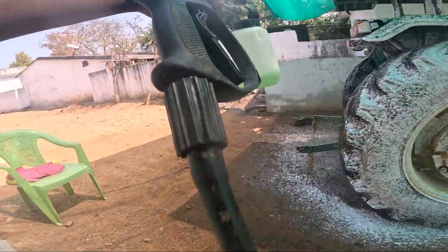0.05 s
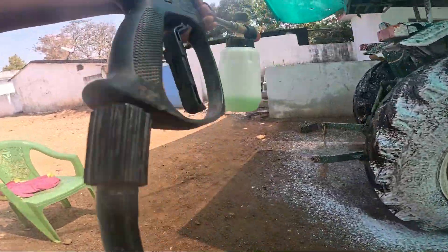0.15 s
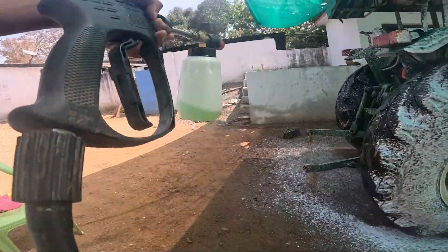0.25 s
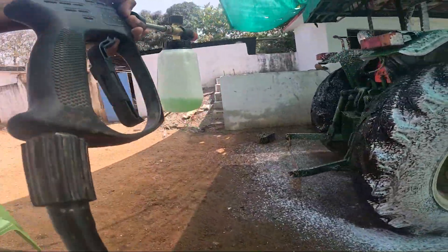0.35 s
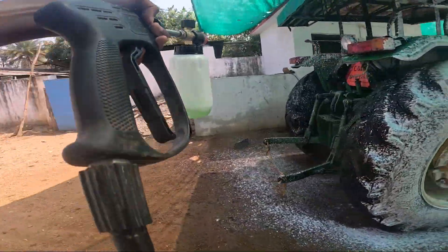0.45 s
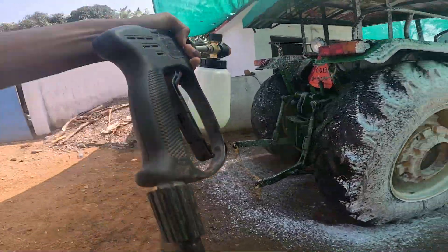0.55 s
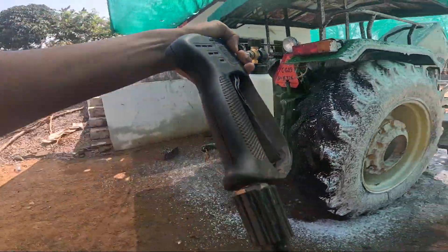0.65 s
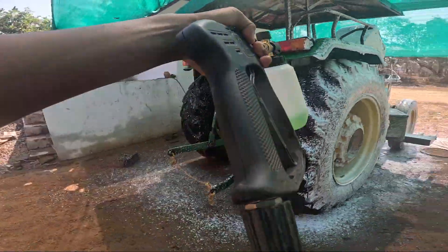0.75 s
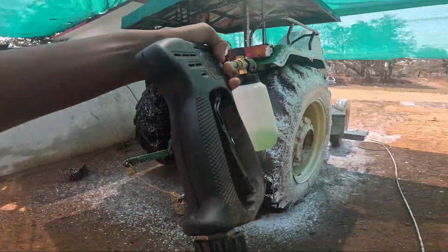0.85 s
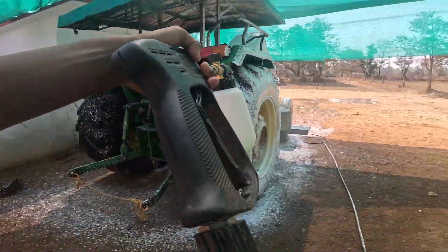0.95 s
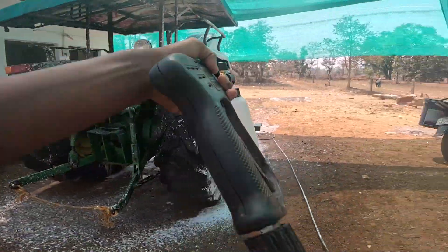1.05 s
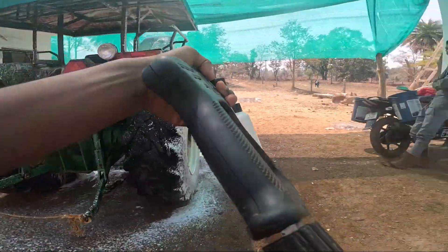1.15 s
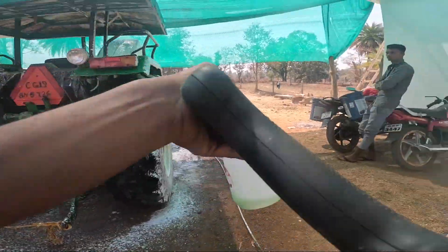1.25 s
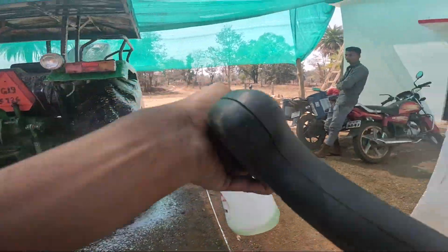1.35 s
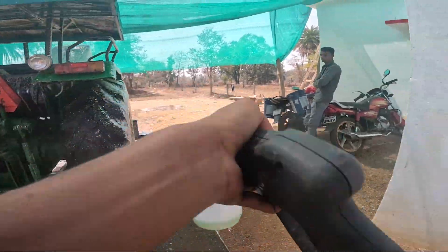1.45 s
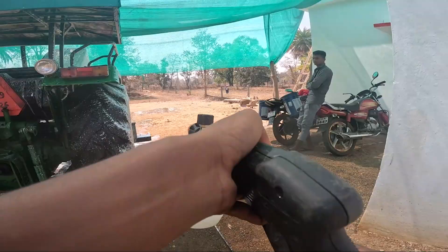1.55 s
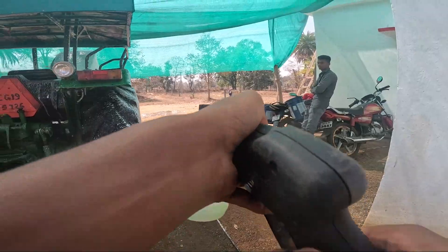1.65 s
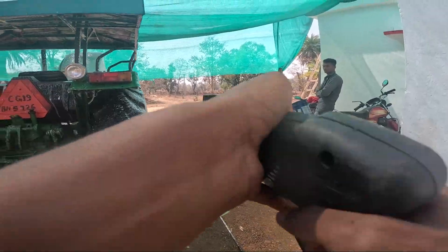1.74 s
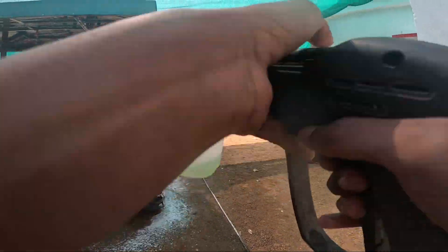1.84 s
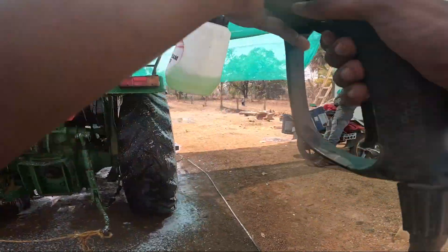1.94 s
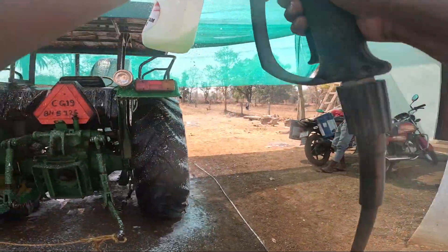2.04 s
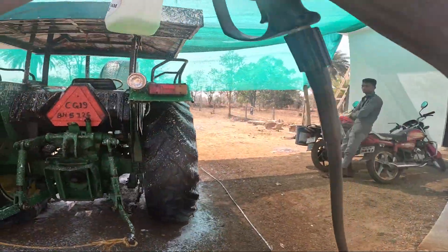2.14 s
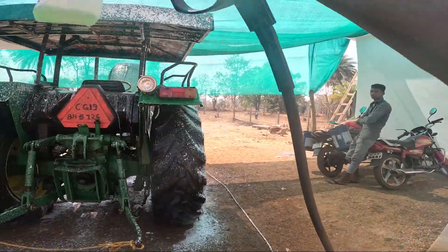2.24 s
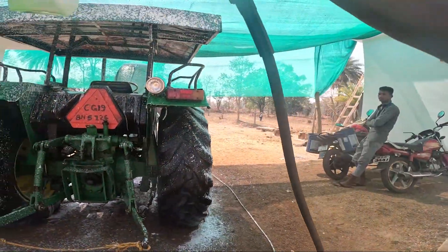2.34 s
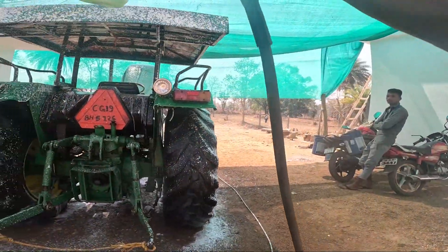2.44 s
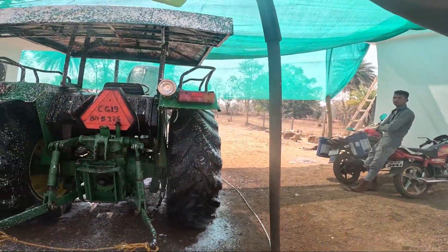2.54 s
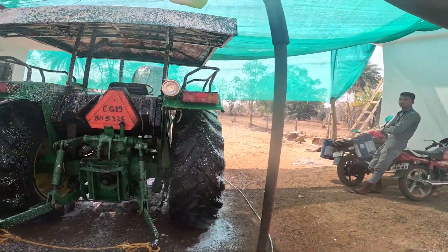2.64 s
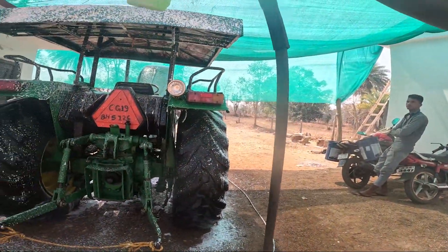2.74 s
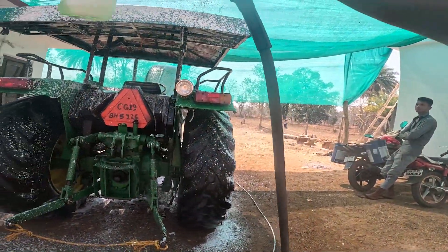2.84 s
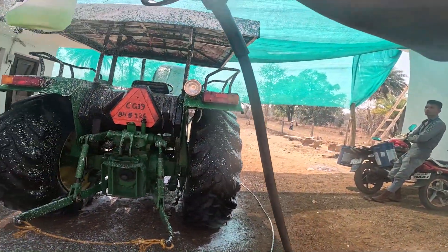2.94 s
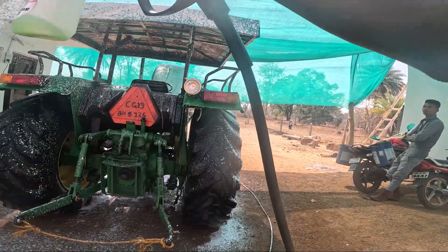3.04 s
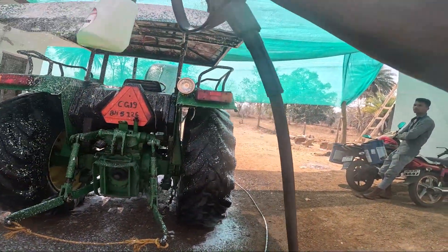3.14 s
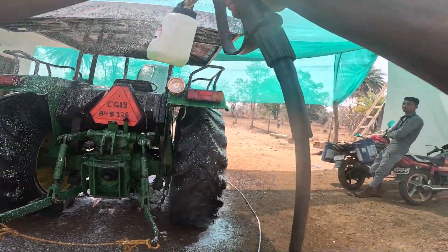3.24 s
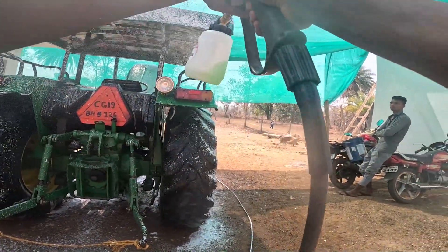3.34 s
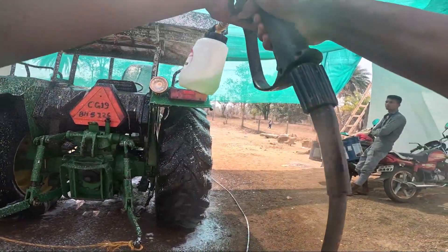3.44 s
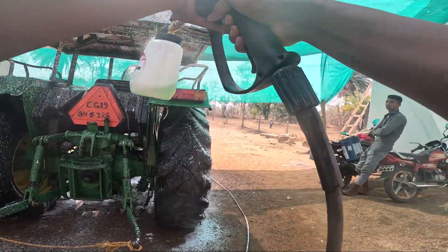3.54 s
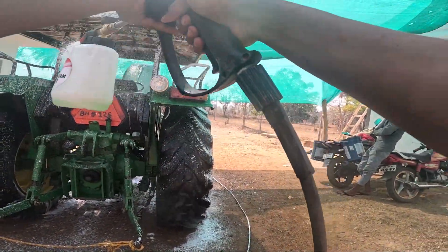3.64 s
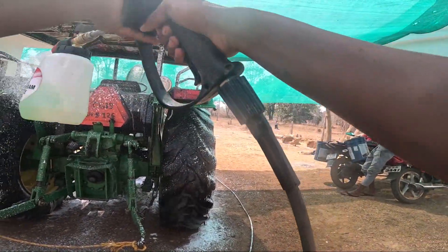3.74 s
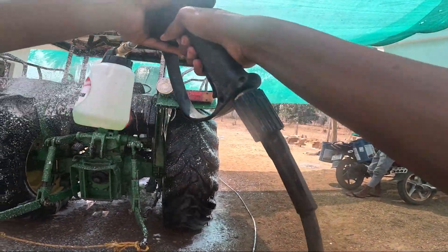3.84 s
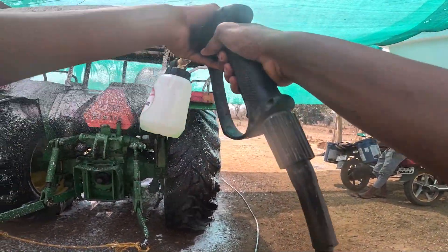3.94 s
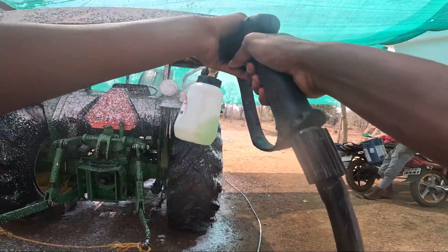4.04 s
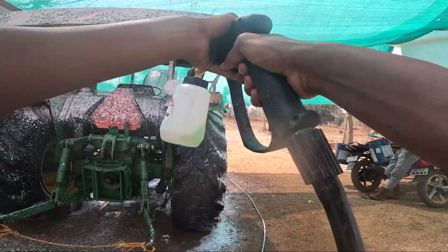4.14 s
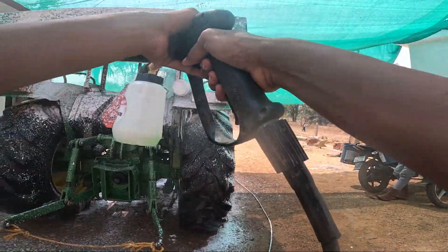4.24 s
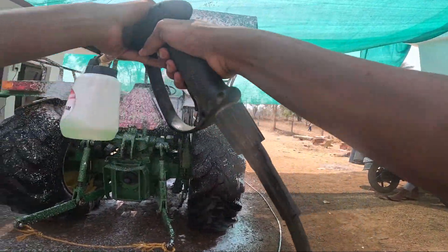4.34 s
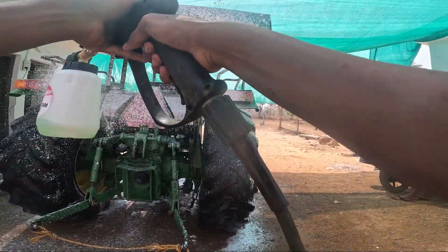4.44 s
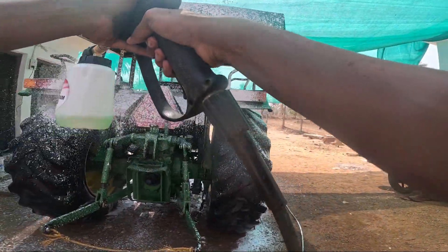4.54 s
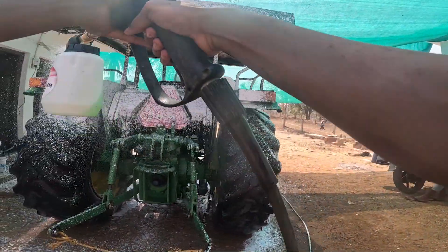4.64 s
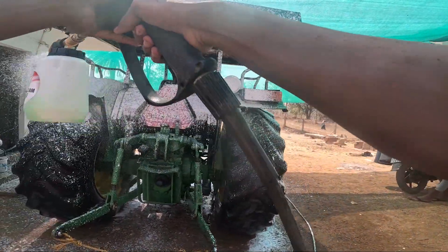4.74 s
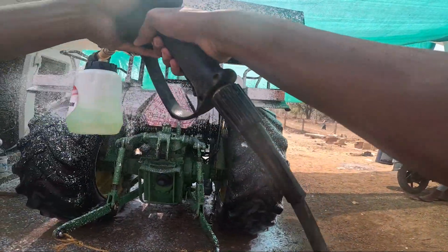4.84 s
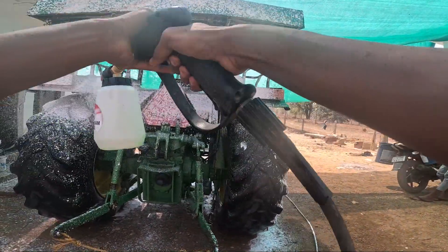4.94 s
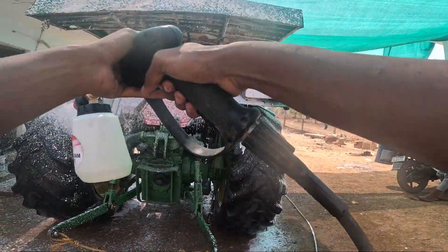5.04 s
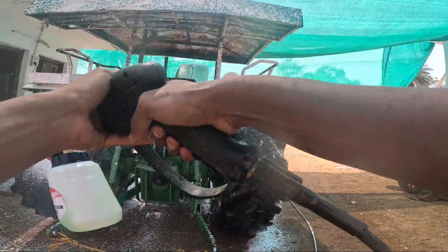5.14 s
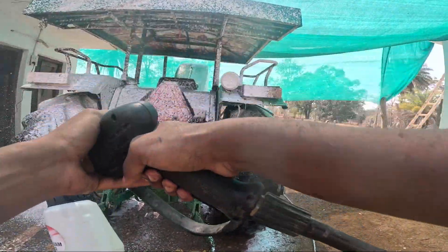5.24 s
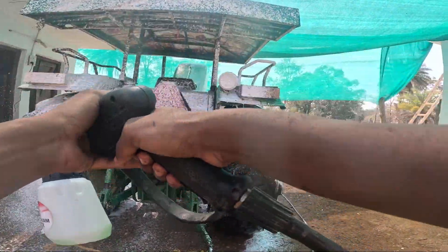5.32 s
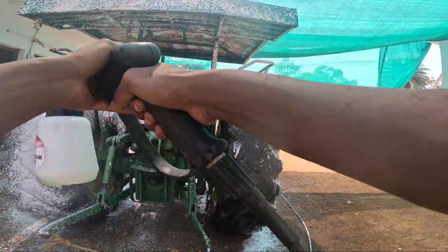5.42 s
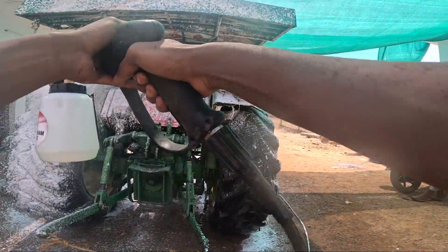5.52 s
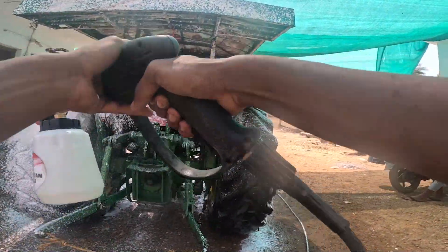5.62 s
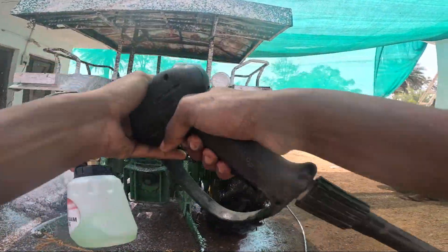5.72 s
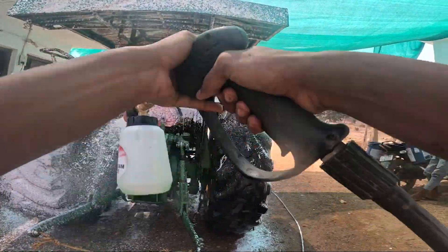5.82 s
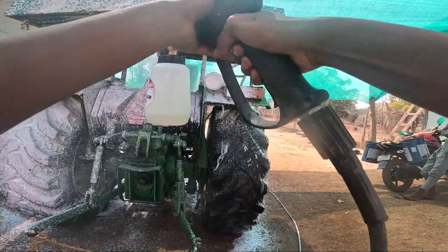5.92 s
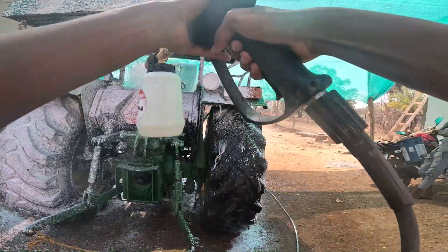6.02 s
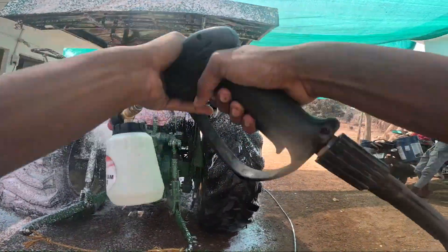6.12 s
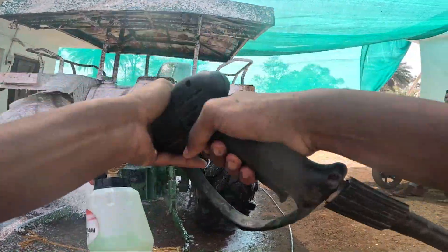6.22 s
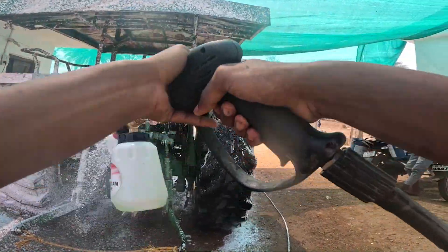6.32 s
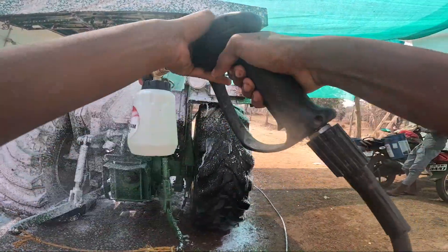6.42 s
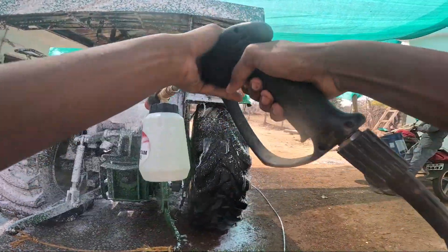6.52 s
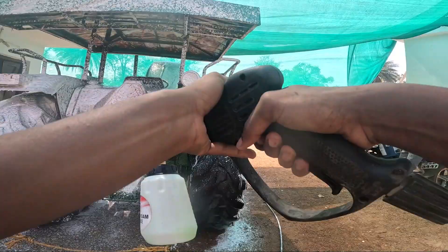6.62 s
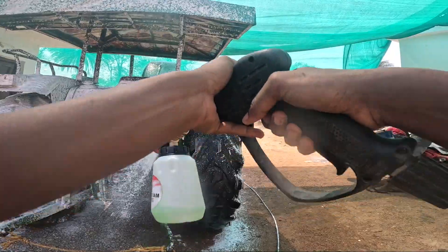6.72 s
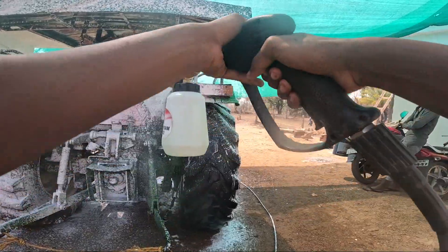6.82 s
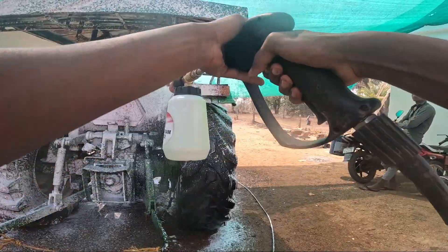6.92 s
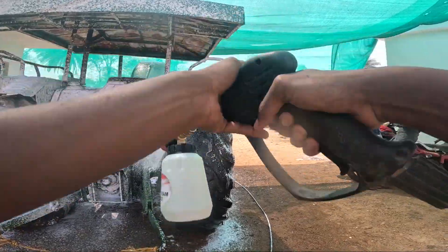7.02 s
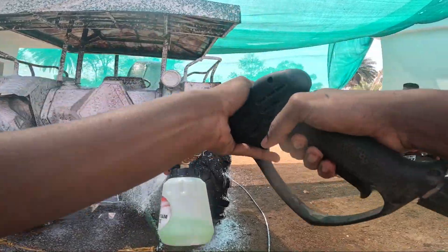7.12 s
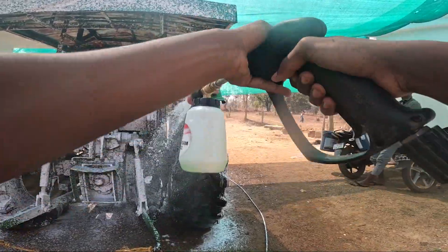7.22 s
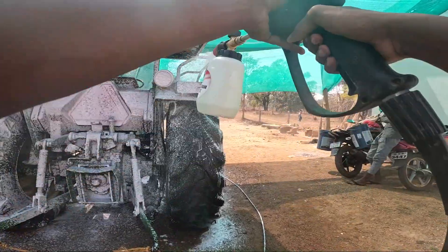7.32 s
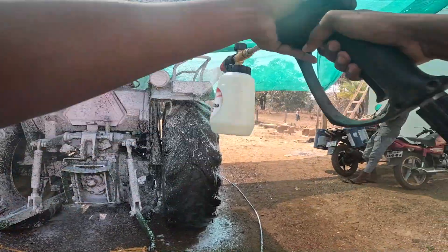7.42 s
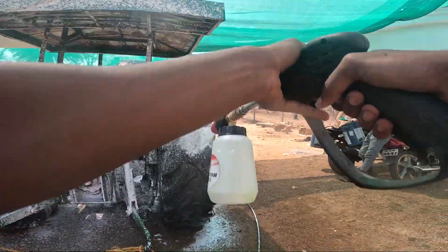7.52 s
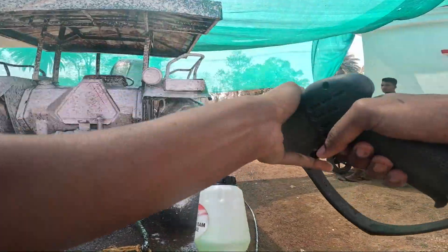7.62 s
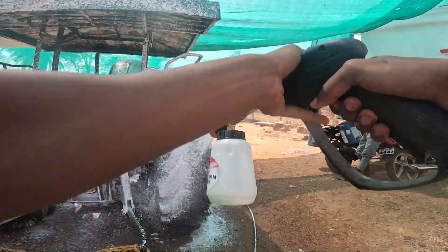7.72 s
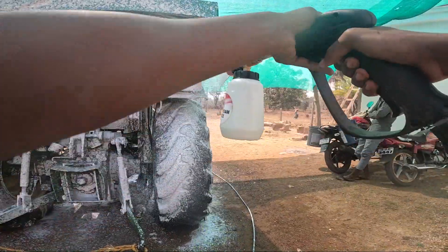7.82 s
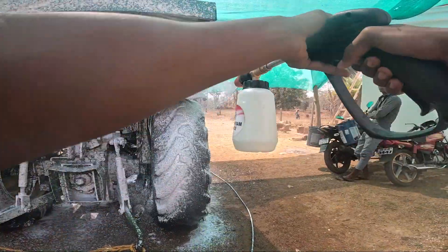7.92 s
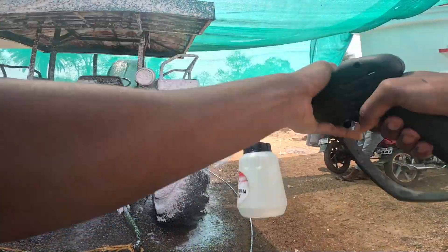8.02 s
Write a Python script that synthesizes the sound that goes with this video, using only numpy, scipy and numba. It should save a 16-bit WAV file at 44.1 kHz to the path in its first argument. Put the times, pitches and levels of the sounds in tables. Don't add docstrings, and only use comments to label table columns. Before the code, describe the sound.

From 0 to 1.9 seconds an open yard is fairly quiet: low wind rumble and soft membrane thumps, strongest around 0.3-0.45 and 0.7-0.8, with faint leaf rustle and cloth brushes. Thin bird chirps scatter through, and a harsh bird caws at about 0.35 and 0.95. Small plastic clicks gather from 1.45, ending in a firm trigger knock at 1.83-1.88. At 1.9 the valve opens with tiny very high squeaks and a coughing, sputtering surge until about 2.2. A loud close jet then continues to the end at 8 seconds: broad, slightly fluttering hiss with hollow rings near 1.2 and 2.7 kilohertz. From 2.25 a steady pump drone around 720 hertz sits beneath. Bright spray washes swell in short sweeps, denser after 4 seconds and strongest around 7.3-7.9, with sharp drop ticks at 2.56, around 6.9, a prominent one at 7.38, and 7.85.

```python
import sys
import numpy as np
from scipy import signal
from scipy.fft import rfft, irfft, next_fast_len
from scipy.io import wavfile
from numba import njit

SR = 44100
rng = np.random.default_rng(int(sys.argv[2]) if len(sys.argv) > 2 else 0)


def wrap_up_sound(samples):
    columns = np.atleast_2d(samples).T
    tamed = np.clip(columns, -1, 1)
    steps = np.round(tamed * 32767).astype(np.int16)
    wavfile.write(sys.argv[1], SR, steps)


def boost(x):
    u = np.asarray(x, float) / 20
    return 10 ** u


N = 355887
TIME = np.arange(N) / SR
TRIGGER_S = 1.884
# pitch_hz, likeness (0-1)
JET_LIKENESS = [(60, 1), (130, 0.96), (290, 0.97), (640, 0.97), (1410, 1), (3100, 0.86), (6820, 0.87),
                (15000, 0.92)]
# pitch_hz, balance_db
JET_BALANCE = [(60, 0.0), (110, -2), (200, -1.5), (380, -1.5), (700, 1), (1290, 1.5), (2380, -3),
               (4400, -0.5), (8120, 1), (15000, 5.5)]
# pitch_hz, likeness (0-1)
YARD_LIKENESS = [(60, 0.79), (130, 0.93), (290, 0.73), (640, 0.8), (1410, 0.7), (3100, 0.24), (6820, 0.7),
                 (15000, 0.94)]


def jet():
    # start_s, flow_db, turn_db (the high chamber gains what the low one loses)
    flow = [(1.884, -27.5, -3.5), (1.935, -27, -2), (1.98, -26.5, -2), (2.1, -24.5, 1), (2.35, -26.5, 1.5),
            (2.49, -27.5, 0), (2.76, -26.5, 0), (3.3, -26, 1), (3.85, -26.5, 1.5), (4.2, -26.5, -1),
            (4.7, -25.5, 0.4), (5.9, -25.5, 0), (6.1, -26, 1.5), (6.8, -25.5, -0.5), (7.27, -26, 2),
            (7.39, -27.5, -1), (7.7, -25.5, 1), (8.07, -27, -0.5)]
    # pitch_hz, level_db (per Hz)
    hiss_colour = [(24, -66), (40, -14.5), (638, -5.5), (715, 2.5), (859, -14), (1210, -4.5), (2100, -1),
                   (2760, -38), (3550, -58), (6590, -17.5), (9500, -20.5), (12400, -55), (20900, -120)]
    # pitch_hz, width_hz, level_db
    whistles = [(1420, 160, -9.5), (4700, 1560, -7.5), (6400, 440, -7), (8720, 620, -13)]
    # start_s, pitch_hz
    low_chamber = [(1.9, 1204), (2.2, 1140), (2.6, 1175), (3.1, 1140), (3.6, 1130), (4.6, 1180),
                   (5.2, 1145), (5.9, 1190), (6.3, 1170), (7, 1210), (7.6, 1170), (8.07, 1160)]
    # start_s, pitch_hz
    high_chamber = [(1.9, 2660), (2.3, 2727), (3.3, 2670), (4.7, 2736), (5.3, 2670), (6, 2694), (6.4, 2655),
                    (7.2, 2705), (8.07, 2660)]

    flow_db, turn_db = in_time(flow)
    age = np.maximum(TIME - TRIGGER_S, 0)
    low_db = flow_db - turn_db + 0.4 + 9 * np.exp(-age / 0.012)
    high_db = flow_db + turn_db + 2 + 6.5 * np.exp(-(age / 0.049) ** 2)

    hiss = boost(-8.5) * patchy_noise(hiss_colour, together_db=1.24, own_db=2.0)
    for hz, width_hz, level_db in whistles:
        hiss += boost(level_db) * chamber(hz, width_hz, wobble=0.025, sputter_db=1.4)
    hiss = lowpass(hiss, 9400, order=6)

    low_hz = in_time(low_chamber)[0] + 5 * drift(0.72)
    low_ring = chamber(low_hz, width_hz=140, wobble=0.005, sputter_db=-0.5)
    low = boost(low_db - 3 + 1.28 * drift(7.6)) * low_ring

    high_hz = in_time(high_chamber)[0]
    high = boost(high_db) * chamber(high_hz, width_hz=220, wobble=0.0011, sputter_db=0.1)
    high += boost(high_db - 10) * chamber(high_hz, width_hz=90, wobble=0.005, sputter_db=0.5)
    return (boost(flow_db) * hiss + low + high) * (TIME > TRIGGER_S)


def splash():
    # pitch_hz, level_db (per Hz)
    splash_colour = [(4000, -16), (7000, -18), (9000, 9.5), (11000, 13), (14000, -5), (16000, -14)]
    # start_s, peak_db, half_length_s, extra_fine_mist_db
    sweeps = [(1.911, -33, .02, -5), (2.224, -42, 0.12, 9), (2.586, -28.5, 0.02, -9), (3.0, -47, .11, 2),
              (3.43, -39, 0.09, 0), (3.943, -31, 0.095, -12), (4.18, -29, 0.15, 9), (4.44, -38, 0.086, 2),
              (4.688, -30, 0.095, -4), (4.808, -35, .04, -2), (4.986, -32, 0.13, -1), (5.24, -30, 0.08, -1),
              (5.53, -29.5, .07, 1), (5.89, -26.5, 0.042, 1), (5.972, -30, 0.012, 3), (6.1, -33, 0.14, -1),
              (6.446, -31.5, .03, 2), (6.52, -35, 0.053, 6), (6.63, -30, 0.11, 1), (6.89, -28, 0.065, -1),
              (7.01, -28, 0.089, 3), (7.307, -24, 0.032, -2), (7.43, -24.5, 0.075, 0),
              (7.546, -32.5, 0.067, 14.5), (7.68, -32, 0.1, 13), (7.79, -33, 0.048, 2),
              (7.88, -21.5, 0.049, 0), (7.974, -26, 0.07, 1)]
    # start_s, length_s, start_hz, end_hz, level_db
    squeaks = [
        (1.9, .025, 14700, 14100, -34),
        (1.925, .01, 14700, 15000, -41),
        (1.942, .01, 13400, 13600, -37),
        (1.953, .008, 12400, 11300, -37),
    ]
    mist_db, airy_db = -39, -65

    full = TIME > 2.127
    haze_db = np.where(full, mist_db, airy_db)
    level_db = swells([row[:3] for row in sweeps], haze_db)
    fine_rows = [(s, db + extra_db, half) for s, db, half, extra_db in sweeps]
    fine_db = swells(fine_rows, haze_db + 1.5) - level_db
    level_db = np.where(full | (TIME < 2), level_db, airy_db)

    spray = patchy_noise(splash_colour, together_db=0.17, own_db=1.1) * boost(1.86 * drift(150))
    fine_filter = signal.butter(2, 12500, "high", fs=SR, output="sos")
    spray = spray + (boost(fine_db) - 1) * signal.sosfiltfilt(fine_filter, spray)
    squeaking = glides(squeaks, warble=1 + 0.004 * drift(200)) * [[1], [0.3]]
    pan_db = np.where(full, -0.4 - 0.06 * (level_db - mist_db), -5)
    landing = boost(level_db + 0.5) * spray * (TIME > TRIGGER_S) + squeaking
    return landing, np.clip(pan_db, -9, 9)


def drops():
    # start_s, peak_db, pitch_hz
    smacks = [(2.5638, -11, 10200), (2.7065, -24, 8680), (3.6543, -19, 7880), (3.7685, -21, 8360),
              (4.0454, -16, 8880), (4.5458, -18, 8360), (4.7733, -16, 11100), (5.8358, -20, 8210),
              (5.972, -17, 8720), (6.406, -22, 8580), (6.5906, -18, 10000), (6.6325, -13, 9010),
              (6.851, -18, 11500), (6.9304, -12, 10800), (6.9653, -16, 11000), (6.9857, -13, 11000),
              (7.2501, -15, 8550), (7.2885, -18, 8660), (7.3794, -5, 7930), (7.4731, -15, 11500),
              (7.8468, -11, 10900)]
    out, age = np.zeros((2, N + SR)), np.arange(SR // 20) / SR
    for s, peak_db, hz in smacks:
        burst = rng.standard_normal((2, len(age)))
        tick = rms_one(band(burst, 0.9 * hz, 1.1 * hz))
        start = round(s * SR)
        out[:, start:start + len(age)] += boost(peak_db - 7.5 - 60 * age / 0.016) * tick
    return out[:, :N]


def coughs():
    # start_s, half_length_s, pitch_hz, width_hz, level_db
    bursts = [
        (1.893, 0.0074, 6000, 6000, -38),
        (1.912, .012, 4060, 900, -29),
        (1.92, 0.027, 2340, 500, -23.5),
        (2.08, 0.045, 3800, 1500, -31),
        (2.15, .05, 6400, 700, -30),
    ]
    return flurries(bursts) * (TIME > TRIGGER_S)


def pump():
    # start_s, level_db
    drone = [(2.1, -35), (2.15, -47), (2.23, -33.5), (2.28, -22.5), (3.25, -23.5), (3.86, -22), (4.41, -23),
             (4.63, -27), (4.96, -25), (6.07, -28.5), (6.74, -27), (7.72, -26.5), (8.07, -24)]
    # start_s, pitch_hz
    stroke = [(2.3, 719.2), (3.6, 719.4), (4.9, 720.3), (5.5, 719.3), (6.4, 718.2), (7, 719.4),
              (8.07, 719.4)]
    # multiple (of the stroke), level_db
    overtones = [(3, -33), (4, -38), (6, -26), (7, -18), (8, -26), (9, -21), (11, -21), (12, -28),
                 (13, -30), (18, -22), (19, -17), (22, -32), (24, -23), (26, -31), (28, -25), (31, -30)]

    level_db = in_time(drone, silent=-120)[0]
    pan_db = 0.6 - 0.4 * (level_db + 22)
    stroke_hz = in_time(stroke)[0] / 10 * (1 + 0.00033 * drift(2.76))
    turns = 2 * np.pi * np.cumsum(stroke_hz) / SR
    others = 0
    for multiple, db in overtones:
        swell = boost(db - 0.5 + drift(0.4))
        others = others + swell * np.sin(multiple * turns + 7 * rng.random())
    tone = boost(level_db) * np.sin(10 * turns) + boost(np.minimum(level_db, -26)) * others
    return panned(np.sqrt(2) * tone, np.clip(pan_db, -8, 4))


def gun():
    # start_s, peak_db, pitch_hz, t60_s, crack_db
    clicks = [(0.154, -36, 2050, 0.045, -12), (0.946, -37, 2600, 0.013, -5.5),
              (1.452, -35.5, 1800, 0.019, -3), (1.475, -31.5, 1500, 0.0089, 2.5),
              (1.536, -35.5, 2400, 0.028, -30), (1.59, -32.5, 2150, 0.013, -9),
              (1.635, -32.5, 2310, 0.011, -12), (1.658, -38, 1490, 0.035, -25),
              (1.728, -41, 2550, 0.019, -14), (1.789, -39, 1670, 0.025, -30),
              (1.802, -47, 2900, 0.032, -11), (1.8287, -16, 1690, 0.012, -22),
              (1.875, -21, 1000, 0.017, -19.5), (1.884, -35, 2540, 0.016, -19)]
    # pitch_ratio, level_db
    shell = [(1.017, 4), (0.515, -7), (1.4, -9), (2.1, 4), (1.03, -7)]
    out, age = np.zeros((2, N + SR)), np.arange(SR // 10) / SR
    for s, peak_db, hz, t60, crack_db in clicks:
        rings = 0
        for ratio, db in shell:
            rings = rings + boost(db + 2 * rng.normal()) * np.sin(2 * np.pi * ratio * hz * age)
        knock, snap = rng.standard_normal((2, len(age)))
        dull = band(knock, 0.5 * hz, 2.2 * hz, order=1)
        crack = boost(crack_db + 4) * band(snap, 2600, 12600)
        hit = boost(peak_db - 60 * age / t60) * (boost(-8.5) * rings + boost(2) * dull + crack)
        start = round(s * SR)
        out[:, start:start + len(age)] += [hit, 0.16 * hit]
    return out[:, :N]


def wind():
    # start_s, rumble_db
    breeze = [(0, -45), (.17, -31.5), (.3, -37), (.44, -33), (.5, -36), (.72, -25.5), (.93, -35.5),
              (1.02, -31.5), (1.4, -32.5), (1.5, -39.5), (1.69, -32.5), (1.8, -41), (2.1, -50.5),
              (3.55, -55.5), (3.85, -45.5), (4.4, -49), (4.62, -39.5), (5.2, -52)]
    # start_s, peak_db, half_length_s, reach_upward_db
    puffs = [(0.033, -52, 0.053, 0), (0.12, -52, 0.054, 4), (0.338, -29.5, 0.02, -17),
             (0.451, -27.5, 0.018, -19), (.54, -39, 0.016, -11), (0.684, -23.5, 0.025, -17),
             (0.717, -16.5, 0.025, -5.5), (0.783, -22.5, 0.049, -16.5), (0.85, -31.5, .025, -32),
             (1.002, -51, .03, -19), (1.14, -38, 0.025, -37), (1.195, -30.5, 0.015, -30),
             (1.367, -48, 0.027, -26), (1.475, -52, 0.021, 11), (1.673, -58, .04, -1),
             (1.87, -53, 0.027, -3)]
    calm_puff_db, calm_flutter_db = -63, -67

    rumble_db = in_time(breeze)[0] + 1.9 * drift(12)
    puff_db = swells([row[:3] for row in puffs], calm_puff_db)
    flutter_db = swells([(s, db + reach_db, half) for s, db, half, reach_db in puffs], calm_flutter_db)
    pan_db = (-0.5 - 0.18 * (puff_db - calm_puff_db)) * (TIME < TRIGGER_S)

    lumps = rng.standard_normal((2, N)) * boost(2 * drift(31))
    rumble = boost(rumble_db) * rms_one(band(lumps, 7.3, 73.5))
    puff = boost(puff_db) * rms_one(band(lumps, 158, 238))
    flutter = boost(flutter_db) * rms_one(lowpass(band(lumps, 147, 880), 420, order=2))
    return panned(ports(rumble + puff + flutter, YARD_LIKENESS), pan_db)


def thumps():
    # start_s, peak_db, pitch_hz
    eddies = [(0.17, -23, 44.5), (0.247, -24, 34.6), (0.339, -16.5, 134), (0.369, -14.5, 122),
              (0.398, -23, 110), (0.437, -12.5, 69), (0.45, -15, 132), (.540, -21, 50), (0.66, -19.5, 70),
              (0.801, -14, 109), (0.876, -25, 54), (1.1, -26, 70), (1.153, -22.5, 134), (1.197, -21.5, 360),
              (1.219, -25, 201), (1.277, -27, 60)]
    out = np.zeros(N)
    for s, peak_db, hz in eddies:
        cycles = (TIME - s) * hz
        push = np.exp(-(cycles / 0.63) ** 2)
        out += boost(peak_db) * push * np.cos(2 * np.pi * (cycles + rng.random()))
    return out * boost(np.array([[-2.3], [2.3]]))


def birds():
    # start_s, length_s, third_partial_top_hz, sag_hz_per_s, fade_db_per_s
    caws = [
        (0.354, 0.19, 2970, 102, 93),
        (0.955, 0.14, 2880, -700, 140),
    ]
    # start_s, length_s,
    # start_hz, end_hz, level_db
    chirps = [(0, 0.023, 2870, 2830, -45.5), (0.219, 0.053, 4700, 4600, -66), (.57, 0.04, 5800, 5700, -57),
              (.54, 0.14, 5250, 5000, -55), (.86, 0.055, 6400, 6500, -58), (1.065, 0.06, 5980, 5880, -58),
              (1.1, 0.03, 5200, 3700, -53), (1.125, 0.058, 2770, 2380, -46.5),
              (1.135, 0.043, 1790, 1660, -54), (1.198, 0.054, 3980, 3950, -58),
              (1.258, 0.037, 6140, 6000, -51), (1.285, 0.05, 5100, 4700, -44),
              (1.297, 0.058, 4300, 4540, -55), (1.487, 0.042, 5130, 4500, -54),
              (1.546, .03, 3900, 3800, -52)]
    edge_s, second_waits_s = 0.016, 0.0412

    out = glides(chirps, warble=1 + 0.02 * drift(150))
    for s, length, top_hz, sag, fade in caws:
        age = np.clip(TIME - s, 0, length)
        scoop = 1 - 0.3 * np.exp(-(age / 0.021) ** 1.62)
        third_hz = top_hz * scoop - sag * np.maximum(age - second_waits_s, 0) - 9000 * age ** 2
        turns = 2 * np.pi * np.cumsum(third_hz * (1 + 0.005 * drift(60)) / 3) / SR
        sounding = np.clip(np.minimum(age, length - age) / edge_s, 0, 1)
        third = boost(-41.5 - fade * age + 1.2 * drift(20))
        second = boost(-49) * np.clip((age - second_waits_s) / edge_s + 0.6, 0, 1)
        upper = boost(42) * third * second * (boost(-3) * np.sin(4 * turns) + np.sin(5 * turns))
        out += sounding * (third * np.sin(3 * turns) + second * np.sin(2 * turns) + upper)
    out *= boost(0.5 + 2.6 * drift(40))

    age = np.arange(SR // 4) / SR
    walls = rng.standard_normal((2, len(age))) * boost(-60 * age / 0.4 - 33)
    return out * [[1], [0]] + signal.fftconvolve(out[None], walls, axes=1)[:, :N]


def stirs():
    # start_s, half_length_s, pitch_hz, width_hz, level_db
    scuffs = [(.03, 0.049, 1890, 500, -52), (.13, 0.022, 2200, 1500, -50), (.17, 0.017, 2500, 2500, -47),
              (.19, .008, 2500, 2500, -49), (.255, .04, 4700, 600, -54), (.355, .01, 3200, 2000, -47),
              (.52, .015, 2800, 1200, -49), (.53, .03, 5600, 1400, -50), (.6, .06, 5800, 500, -59),
              (.7, .02, 5600, 2500, -56), (.8, .03, 2800, 2500, -47), (.87, .03, 6600, 700, -58),
              (.86, 0.053, 1790, 700, -54), (.902, .008, 2200, 1500, -54), (.965, .015, 3800, 200, -54),
              (1.075, .008, 3200, 1500, -56), (1.115, .015, 4500, 1400, -53), (1.21, .012, 2600, 2200, -52),
              (1.27, .05, 6900, 1200, -59), (1.57, .015, 6500, 3000, -56), (1.32, .04, 4320, 700, -51),
              (1.36, .03, 2600, 800, -58), (1.4, .02, 5000, 900, -61), (1.51, 0.022, 4500, 1000, -55),
              (1.67, 0.027, 2200, 2000, -51), (1.74, .02, 2600, 1500, -57), (1.81, .012, 3000, 1000, -50)]
    return flurries(scuffs)


def yard():
    # pitch_hz, level_db (per Hz)
    yard_colour = [(180, -55), (300, -3), (404, 6), (687, -71), (1130, -6), (1770, -9), (3260, -15.5),
                   (4700, -12), (8390, -17), (11300, -5), (15800, -20)]
    # start_s, peak_db, half_length_s
    brushes = [(0.164, -53, 0.015), (0.246, -60, 0.034), (0.352, -51, 0.026), (0.488, -57, 0.075),
               (0.665, -51, 0.04), (0.817, -54.5, 0.1), (1.08, -64, 0.099), (1.215, -53, 0.086),
               (1.477, -52, 0.022), (1.57, -52, 0.017), (1.803, -59, 0.065)]
    lull_db = -2.5 * np.exp(-((TIME - 1.73) / 0.06) ** 2)
    cloth_db = swells(brushes, -61) + 1.5 * lull_db
    leaves_db = swells([(s, db - 2.5, half) for s, db, half in brushes], -51.5) + lull_db

    stir = patchy_noise(yard_colour, together_db=1.0, own_db=1.9)
    leaves = band(lowpass(stir, 6500, order=3), 1600, 10000, order=3)
    cloth = band(stir, 7800, 17000)
    return boost(leaves_db) * rms_one(leaves) + boost(cloth_db) * rms_one(cloth)


def nearby(x):
    # delay_s, level_db
    echoes = [(.0043, -9), (.0097, -13.5), (0.0178, -11.5)]
    out = x.copy()
    bright = signal.sosfilt(signal.butter(2, 900, "high", fs=SR, output="sos"), x)
    for delay, level_db in echoes:
        late = TIME - delay * (1 + 0.03 * drift(0.7))
        out += boost(level_db) * np.array([np.interp(late, TIME, channel) for channel in bright])
    return out


def ports(pair, likeness, balance=[(1, 0)], phase=[(1, 0)]):
    size = next_fast_len(N)
    hz = np.arange(size // 2 + 1) * SR / size
    shared, apart = rfft(pair, size)
    alike = np.clip(at_hz(likeness, hz), 0, 1)
    apart = apart * np.sqrt((1 - alike) / (1 + alike))
    offset = boost(at_hz(balance, hz) / 2) * np.exp(0.5j * at_hz(phase, hz))
    both = np.array([(shared + apart) * offset, (shared - apart) / offset])
    return irfft(both, size)[:, :N]


def panned(x, pan_db):
    return x * boost(np.array([pan_db / 2, -pan_db / 2]))


def chamber(hz, width_hz, wobble, sputter_db):
    centre = hz * (1 + wobble * drift(6.2))
    ring = rms_one(resonate(rng.standard_normal((2, N)), centre, width_hz, SR))
    return boost(sputter_db * drift(41)) * ring


@njit
def resonate(x, hz, width, rate):
    out, r = np.zeros_like(x), np.exp(-np.pi * width / rate)
    for i in range(2, x.shape[1]):
        turn = 2 * r * np.cos(2 * np.pi * hz[i] / rate)
        for c in range(2):
            out[c, i] = x[c, i] - x[c, i - 2] + turn * out[c, i - 1] - r * r * out[c, i - 2]
    return out


def patchy_noise(spectrum, together_db, own_db):
    out, together = 0, drift(33) + drift(80)
    edges = 40 * 2 ** np.arange(0, 9.1, 0.5)
    white = rng.standard_normal((2, 2, N))
    for k, (low, high) in enumerate(zip(edges, edges[1:])):
        flicker_db = together_db * together + own_db * drift(19.6)
        level_db = at_hz(spectrum, np.sqrt(low * high)) + flicker_db
        out = out + boost(level_db) * band(white[k % 2], low, high)
    return rms_one(out)


def flurries(rows):
    out, white = np.zeros((2, N)), rng.standard_normal((2, 3 * SR))
    early = TIME[:3 * SR]
    for s, half, hz, width_hz, level_db in rows:
        cloud = rms_one(band(white, max(hz - width_hz / 2, 300), hz + width_hz / 2))
        out[:, :3 * SR] += boost(level_db) * np.exp(-((early - s) / half) ** 2) * cloud
    return out


def glides(rows, warble):
    out = np.zeros(N)
    for start, length, start_hz, end_hz, level_db in rows:
        part = np.clip((TIME - start) / length, 0, 1)
        hz = (start_hz + (end_hz - start_hz) * part) * warble
        turns = 2 * np.pi * np.cumsum(hz) / SR
        out += boost(level_db) * np.abs(np.sin(np.pi * part)) ** 0.11 * np.sin(turns)
    return out


def swells(rows, floor_db):
    power = boost(2 * floor_db)
    for s, db, half in rows:
        power = power + boost(2 * db) * np.exp(-2 * np.abs((TIME - s) / half) ** 2.4)
    return 10 * np.log10(power)


def drift(rate):
    r = np.exp(-80 * np.pi * rate / SR)
    coarse = rng.standard_normal(N // 40 + 2002)
    slow = signal.lfilter([1], [1, -2 * r, r * r], coarse)[2000:]
    return np.interp(np.arange(N) / 40, np.arange(len(slow)), rms_one(slow))


def in_time(rows, silent=None):
    s, *columns = np.transpose(rows)
    return [np.interp(TIME, s, c, left=silent) for c in columns]


def at_hz(points, hz):
    points = np.array(points, float)
    return np.interp(np.log(hz + 1), np.log(points[:, 0] + 1), points[:, 1])


def band(x, low, high, order=2):
    return signal.sosfilt(signal.butter(order, [low, high], "band", fs=SR, output="sos"), x)


def lowpass(x, hz, order):
    return signal.sosfilt(signal.butter(order, hz, fs=SR, output="sos"), x)


def rms_one(x):
    return x / np.sqrt(np.mean(x ** 2) + 1e-20)


def scene():
    # start_s, pan_db
    aim = [(1.9, 0.5), (2.89, 2.5), (4.29, 1), (4.8, 2), (5.44, 3.5), (6.09, 2), (6.33, 2.5), (8.07, 0)]
    # pitch_hz, phase (radians)
    jet_phase = [(0, -0.44), (780, -0.099), (1290, -0.73), (2240, -0.61), (2840, -0.69), (3700, -0.61),
                 (4820, -0.11), (5770, -0.6), (6550, -0.24), (14100, 0.7), (15500, 0.1)]
    lance = ports(nearby(jet()) + gun(), JET_LIKENESS, JET_BALANCE, jet_phase)
    washer = panned(lance, in_time(aim)[0] - 0.5) + pump()
    spray, pan_db = splash()
    landing = panned(ports(spray, JET_LIKENESS, JET_BALANCE), pan_db)
    bursts = ports(drops() + coughs(), JET_LIKENESS, JET_BALANCE)
    air = wind() + thumps() + ports(yard() + birds() + stirs(), YARD_LIKENESS)
    return washer + landing + bursts + air


def band_limit(x):
    return signal.sosfilt(signal.butter(12, 15900, fs=SR, output="sos"), x)


def record(dry):
    # pitch_hz, level_db
    treble_shape = [(9000, 0), (11600, 1), (12100, -4), (14000, -7), (15500, -7), (15850, -10), (15950, -70)]
    size = next_fast_len(N)
    hz = np.arange(size // 2 + 1) * SR / size
    heard = irfft(rfft(dry, size) * boost(at_hz(treble_shape, hz)), size)[:, :N]
    return band_limit(0.84 * np.tanh(heard / 0.92))


dry = scene()
out = record(dry)
wrap_up_sound(out)
```